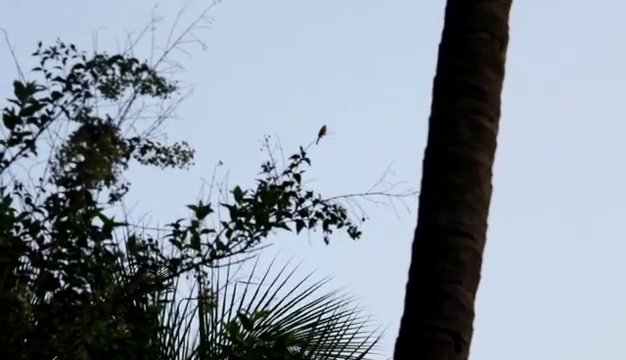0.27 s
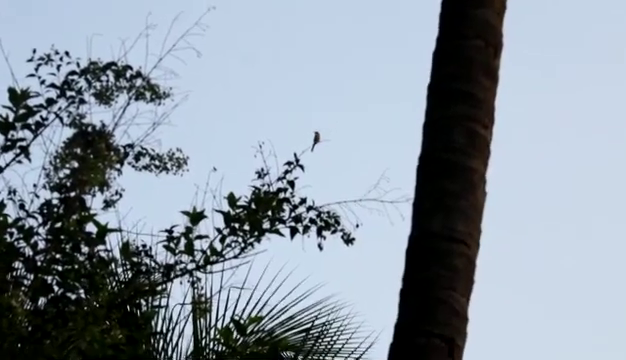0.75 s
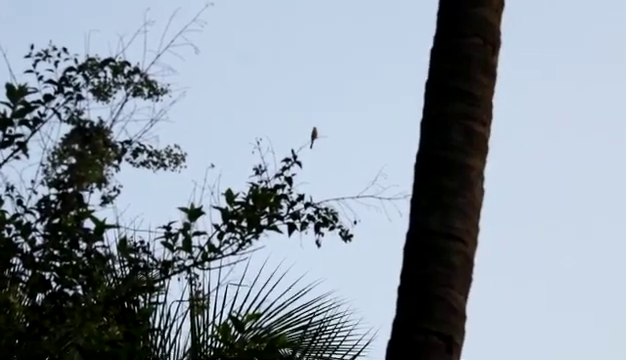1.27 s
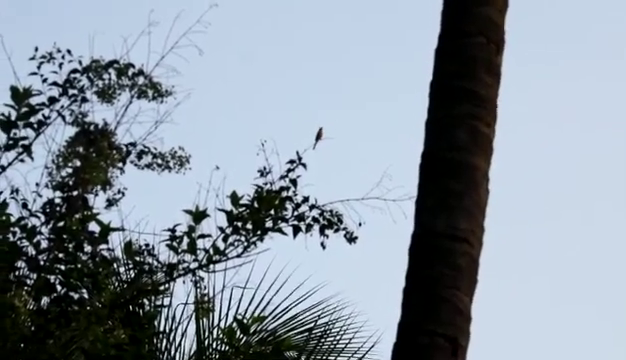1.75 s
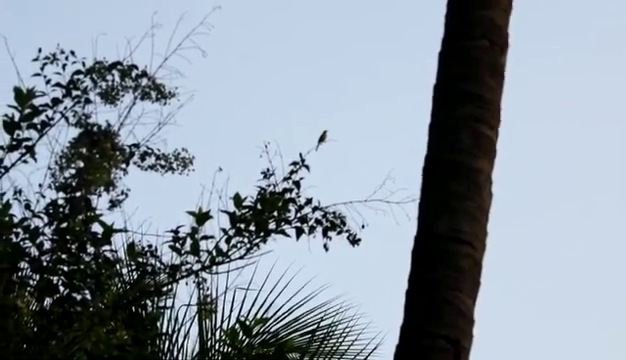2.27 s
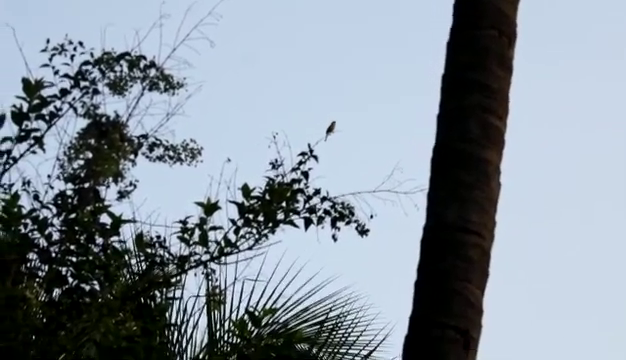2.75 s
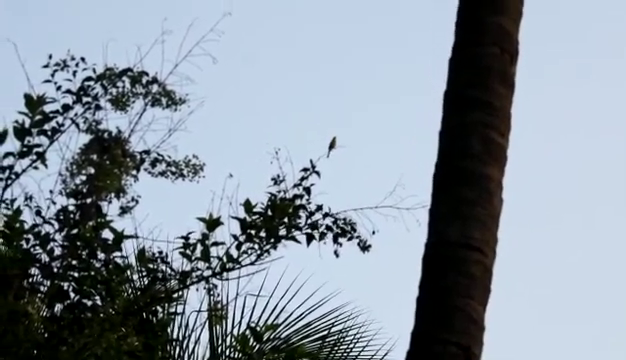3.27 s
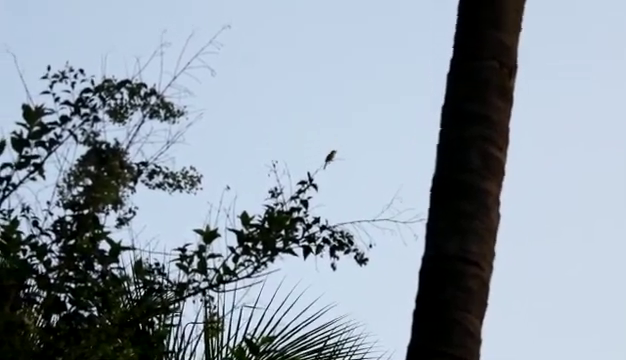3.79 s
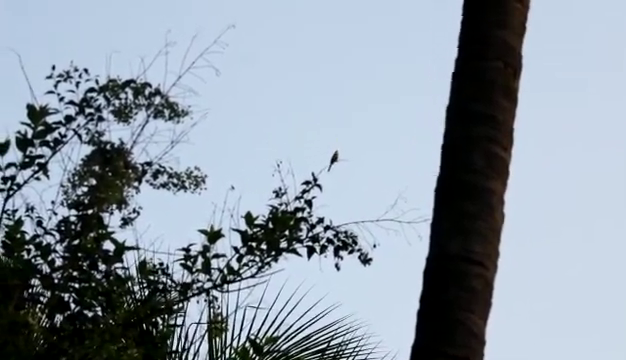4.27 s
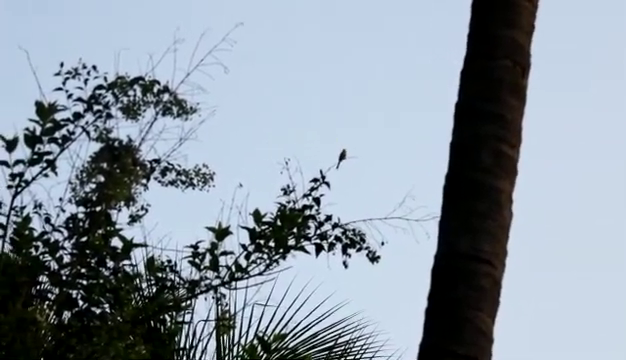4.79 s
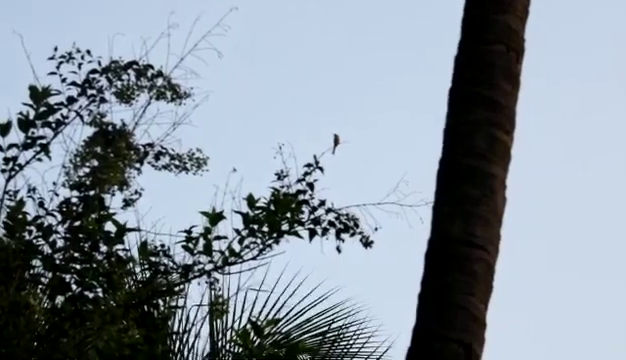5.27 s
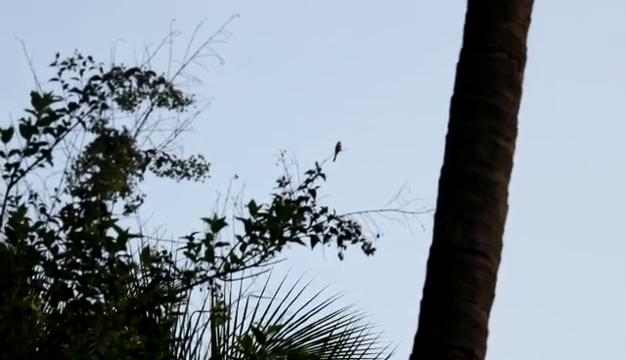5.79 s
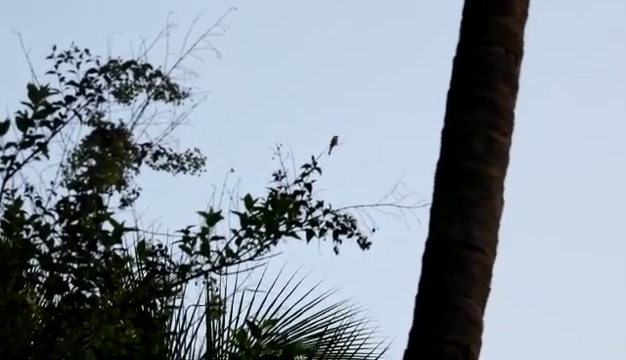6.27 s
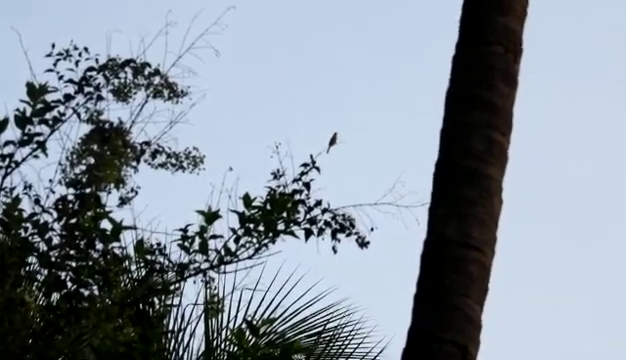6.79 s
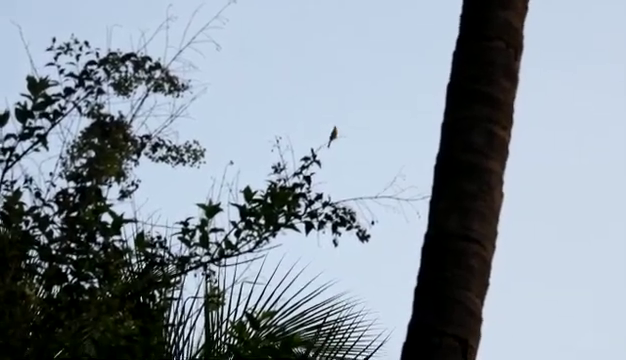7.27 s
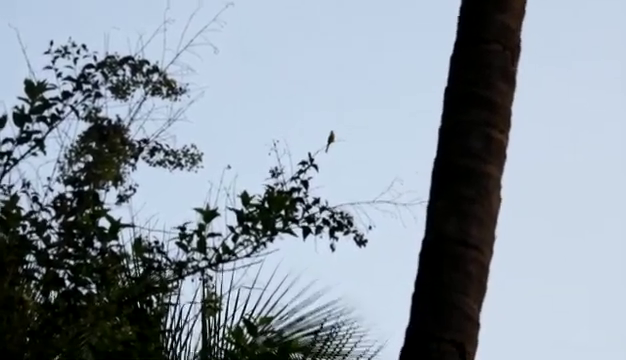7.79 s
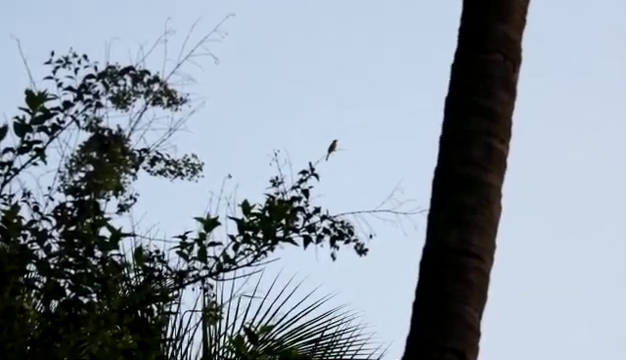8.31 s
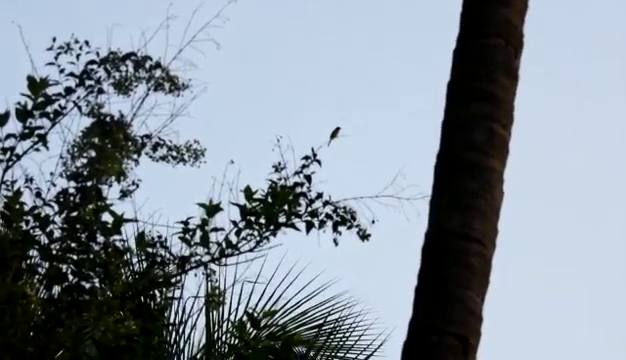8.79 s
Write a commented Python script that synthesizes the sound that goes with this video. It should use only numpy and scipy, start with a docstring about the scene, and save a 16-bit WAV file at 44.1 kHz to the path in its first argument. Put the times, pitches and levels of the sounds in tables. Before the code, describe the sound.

A small bird sings two bouts of rapid, evenly repeated clear high four-note phrases outdoors, over shimmering insect drone, faint distant whistles and dull knocks.

```python
"""A small bird on a twig sings two bouts of a four-note phrase at dawn, as near-sine notes that swell and
glide. A wall behind returns each note; other walls and leaves blur the reply. Other birds whistle far off, and
a village adds hollow tones, dull ticks and band-filtered rustles. Insects drone in two bands of pulsed,
resonant noise above a low murmur of shaped noise and a thin wide hiss."""
import sys
import numpy as np
from scipy import signal
from scipy.fft import rfft, irfft
from scipy.io import wavfile
from scipy.ndimage import uniform_filter1d

SR = 44100
rng = np.random.default_rng(int(sys.argv[2]) if len(sys.argv) > 2 else 0)


def unload_wav(signal):
    """Save mono or channel-first audio to the path in sys.argv[1] as 16-bit WAV at rate SR, clipped to [-1, 1]."""
    wavfile.write(
        sys.argv[1],
        SR,
        np.round(np.clip(np.atleast_2d(signal).T, -1, 1) * 32767).astype(np.int16),
    )


N = 398663

# The bird's notes
OVERTONE_DB = -52   # centre of the chance level of the octave
ATTACK_DB, RELEASE_DB, DROP_MS = 22, 39, 1.91
SWEEP_LEAD_MS, SWEEP_MS = 3.2, 7.3   # the upsweep is steepest this long before the loudest moment
NOTE_SPREAD_HZ, NOTE_SPREAD_DB = 8, 0.5   # chance from note to note
# The wall is too small to return the lower pitches fully
WALL_MS, WALL_BASS_HZ = 31.42, 4120
GARDEN_DB, GARDEN_T60_S, GARDEN_RISE_S = -5, 0.78, 0.0067

# Far whistles
WOBBLE_HZ, BUZZ_WOBBLE_HZ = 32, 60   # spread of the fast pitch wobble, wider in buzzy calls
BUZZ_HZ, WAVER_DB = 232.6, 1.5
FAR_WET_DB, FAR_T60_S, FAR_RISE_S = -1, 1.0, 0.025

# Village, insects and air
HUM_ROUGH, HUM_RISE_S = 0.4, 0.017   # share of noise in the low tones, and their rise
RUSTLE_HOLD_S, RUSTLE_FLICKER_DB = 0.04, 1.2
LOW_PULSE_HZ, HIGH_PULSE_HZ = 63.5, 120.3   # mean wing strokes a second
HISS_DB, HISS_FLICKER_DB = -66.5, 2.5
CUTOFF_HZ = 14250


def amp(db):
    """Decibels to a linear gain."""
    return 10 ** (np.asarray(db) / 20)


def rms_one(x):
    """Scale a sound to rms 1."""
    return x / np.sqrt(np.mean(x ** 2) + 1e-20)


def clock():
    """Time of every sample in seconds."""
    return np.arange(N) / SR


def drift(rate):
    """Slow chance of rms 1: noise knots smoothed by a one-pole low-pass, with its corner at rate [Hz]."""
    knots_hz = 40
    knots = rng.standard_normal(int(N / SR * knots_hz) + 2)
    smooth = signal.lfilter([1], [1, -np.exp(-2 * np.pi * rate / knots_hz)], knots)
    return np.interp(clock() * knots_hz, np.arange(len(knots)), rms_one(smooth))


def resonate(x, hz, width_hz):
    """Ring a sound through one two-pole resonance; a narrower width rings longer."""
    r = np.exp(-np.pi * width_hz / SR)
    feedforward = [(1 - r * r) / 2, 0, (r * r - 1) / 2]
    feedback = [1, -2 * r * np.cos(2 * np.pi * hz / SR), r * r]
    return signal.lfilter(feedforward, feedback, x)


def coloured(spectrum):
    """Noise of rms 1 whose spectrum runs straight between the given points on a log pitch scale."""
    hz, db = np.transpose(spectrum)
    grid = np.maximum(np.fft.rfftfreq(N, 1 / SR), 1)
    colour = amp(np.interp(np.log(grid), np.log(hz), db))
    return rms_one(irfft(rfft(rng.standard_normal(N)) * colour, N))


def add(track, s, sound):
    """Mix a sound into a track at s seconds, trimmed at the end."""
    at = round(s * SR)
    track[at:at + len(sound)] += sound[:max(N - at, 0)]


def scatter(x, t60, rise_s):
    """Leaves and walls all round: a dense noise tail of unit energy, decaying exponentially."""
    t = np.arange(SR) / SR
    tail = rng.standard_normal(SR) * amp(-60 * t / t60) * (1 - np.exp(-t / rise_s))
    return signal.fftconvolve(x, tail / np.sqrt(np.sum(tail ** 2)))[:N]


def swell(s, rise_s, hold_s, t60):
    """An envelope that rises in a straight line, holds and dies away exponentially."""
    t = clock() - s
    return np.clip(t / rise_s, 0, 1) * amp(-60 * np.maximum(t - rise_s - hold_s, 0) / t60)


def sung_note(shape, level_db, change_hz, chance):
    """A near-sine with a faint octave; it swells, glides and breaks off."""
    _, hz, _, _, swell_ms, swell_db, attack_ms, release_ms, drop_hz, glide, sweep_hz = shape
    t = np.arange(-swell_ms, release_ms, 1000 / SR)   # ms from the loudest moment
    age = t + swell_ms

    pitch = hz + change_hz + NOTE_SPREAD_HZ * chance[0] + glide * t
    pitch = pitch + drop_hz * np.exp(-age / DROP_MS)
    pitch = pitch + sweep_hz * np.tanh((t + SWEEP_LEAD_MS) / SWEEP_MS)
    phase = 2 * np.pi * (np.cumsum(pitch) / SR + rng.random())

    shape_db = np.where(t < 0, swell_db * t / swell_ms, -RELEASE_DB * (t / release_ms) ** 2)
    shape_db = shape_db - ATTACK_DB * np.exp(-(age / attack_ms) ** 2)
    size = amp(level_db + NOTE_SPREAD_DB * chance[1] + shape_db)
    size = uniform_filter1d(size, size=40) * signal.windows.tukey(len(t), 0.1)
    octave = amp(OVERTONE_DB + 3 * chance[2]) * np.sin(2 * phase)
    return size * (np.sin(phase) + octave)


def singer():
    """Sung phrases and their reflections; the wall hears the bird from another side, so echo levels differ."""
    # The four notes of a phrase, each timed at its loudest moment:
    # (place in the phrase [ms], base pitch [Hz], level [dB], echo change [dB], swell [ms], swell [dB],
    #  attack [ms], release [ms], onset drop [Hz], glide [Hz per ms], upsweep to either side [Hz])
    notes = [(-92, 4315, -9.5, 3, 16, 14, 2, 7.5, 149.5, -2.5, -0.5),
             (-64.5, 4700, -0.5, .8, 19, 15.5, 2.3, 7.7, 199.5, -5, -2),
             (-36, 5085, 4, -2, 26.3, 13.5, 5.1, 6.9, 1900.5, -15, 1),
             (3, 4562, 2, 1.5, 28.73, 4.5, 6.3, 16.3, -1, 18, 365)]
    # Phrases as sung: (time [s], level [dB], wall echo [dB], level change of notes one, two and three [dB each],
    #  pitch change of notes one and two [Hz each], their extra echo [dB], their shift [ms], shift of note three [ms])
    phrases = [(1.2816, -18, 0, -2, -5, 0, -20, 60, -1, .3, -1),
               (1.5655, -17, -0.5, 0, -0.5, 0, -60, -32, -2, 0, 1),
               (1.8245, -16.5, -1, 1.5, -3, 1, 56, 70, -1, 0, 1.3),
               (2.1157, -17.5, -1.5, 2.5, 0.5, 1, 30, -39.5, 2, -1.5, -2),
               (2.375, -17.5, -1, 1.5, .5, -1, -86, -60, 0.5, -1, .7),
               (2.6571, -17.5, -2, -.5, 1, 1, -30.5, 10, 1.5, -1, 1),
               (2.942, -16.5, -3, -2, 0.5, -.5, 10, -60, 0, -0.5, -0.2),
               (3.2267, -17, 0, 1, 2, -0.5, -60, -30, 0, -1.5, -0.2),
               (3.5558, -17.5, -1, 0.5, .5, 0, 10, -20, 2, -0.5, 0.2),
               (3.8421, -17.5, -1.5, 3.5, -1, .5, 70, -30, 3.5, -2.5, -0.9),
               (4.1206, -17.5, 0, -2, -1.5, -2, 10, -61, -1.5, -1.1, -0.5),
               (6.8911, -17, 1, 3, -1, -.5, 60, 1, -.5, 1.5, 1),
               (7.17, -17, -0.5, 0.5, -2, 1.5, -31, 10, 1, .7, 1.8),
               (7.4456, -15.5, 0.5, 1.5, -3, -.5, -35, 25, 1, .3, 0.5),
               (7.7163, -15.5, 0, 3, -2, -1.5, 30, 60, -1, 1.2, -1),
               (7.9841, -16, -1.5, 0, -0.5, -3, 10, -18, -1, 0, -2.7),
               (8.276, -17, 0, 2, -1.5, -0.5, -36, -50, -0.5, -.1, -1),
               (8.558, -17, 1.5, -0.5, -.5, -1.5, -34, -15, 1, -.2, 1),
               (8.8346, -17, 0.5, 0.5, -1, -0.5, 10, -15, -1, -0.3, 2),
               (9.1243, -16.5, -1.5, 0, -1, 0, 0, 0, 0, 0, 0)]
    # Ground and branches near the path: (delay [ms], signed gain [ratio])
    near = [(1.75, -0.082), (2.378, -0.024), (3.56, 0.048), (4.87, 0.11), (5.741, 0.15), (6.49, 0.17)]
    # Other walls, nearer and farther: (delay [ms], level [dB])
    late = [(62.6, -14), (17.06, -16.5), (45, -13), (77, -26), (95, -23.5)]

    direct, wall = np.zeros(N), np.zeros(N)
    for (s, phrase_db, wall_db, first_db, second_db, third_db,
         first_hz, second_hz, extra_db, opening_ms, third_ms) in phrases:
        changes = [(first_db, first_hz, extra_db, opening_ms),
                   (second_db, second_hz, extra_db, opening_ms),
                   (third_db, 0, 0, third_ms),
                   (0, 0, 0, 0)]
        for shape, (change_db, change_hz, more_echo_db, change_ms) in zip(notes, changes):
            place_ms, _, level_db, echo_db, swell_ms = shape[:5]
            chance = rng.standard_normal(4)
            note = sung_note(shape, phrase_db + level_db + change_db, change_hz, chance)
            start = s + (place_ms + change_ms - swell_ms) / 1000
            add(direct, start, note)
            reply_db = wall_db + echo_db + more_echo_db + NOTE_SPREAD_DB * chance[3]
            add(wall, start + WALL_MS / 1000, amp(reply_db) * note)

    bass_cut = signal.butter(4, WALL_BASS_HZ, "high", fs=SR, output="sos")
    wall = signal.sosfilt(bass_cut, wall + 1e-18)
    for ms, late_db in late:
        add(wall, ms / 1000, amp(late_db) * direct)

    # Short reflections comb the direct sound and the wall replies alike
    hz = np.fft.rfftfreq(N, 1 / SR)
    paths = 1 + sum(gain * np.exp(-2j * np.pi * hz * ms / 1000) for ms, gain in near)
    garden = amp(GARDEN_DB) * scatter(direct, GARDEN_T60_S, GARDEN_RISE_S)
    return irfft(rfft(direct + wall) * paths, N) + garden


def far_birds():
    """Gliding, wobbling whistles with buzz tones above; they waver in the air and echo."""
    # (time [s], length [s], first pitch [Hz], last pitch [Hz], level [dB], buzz against the whistle [dB])
    whistles = [(0.151, 0.37, 3380, 3980, -55, -30), (0.415, 0.055, 3960, 3960, -45, -32),
                (0.57, 0.23, 4240, 3900, -51.5, -30), (0.71, .25, 3260, 2860, -53.5, -20),
                (1.319, .055, 2380, 2420, -37, -7), (1.54, 0.028, 2610, 1706, -43, -4),
                (1.56, 0.057, 1640, 1995, -43.5, -4), (1.585, 0.18, 2180, 2187, -51.5, -20.5),
                (3.285, .08, 2300, 2475, -48, -4.5), (3.644, 0.034, 2060, 2030, -46.5, -26),
                (4.53, 0.31, 2785, 2775, -53, -28), (4.69, 0.12, 3750, 3840, -58, -30),
                (5.509, 0.057, 2380, 2307, -41, -9), (5.552, 0.14, 3960, 3970, -55, -30),
                (5.748, 0.028, 2290, 1710, -45, -2), (5.77, 0.033, 1720, 1900, -44, -4.5),
                (5.779, 0.13, 2090, 2140, -49, -22), (5.775, 0.25, 3970, 3950, -52, -32),
                (5.849, 0.17, 3790, 3680, -52, -32), (6.358, 0.16, 2050, 2160, -53.5, -33),
                (6.738, 0.054, 3520, 3200, -57, -37), (6.94, .18, 3380, 3650, -53.5, -33),
                (7.488, .07, 3700, 3170, -55, -31), (8.05, .08, 3620, 3200, -54, -30),
                (7.719, 0.16, 2165, 2014, -52.5, -30), (8.26, 0.19, 3380, 3700, -51, -32)]
    out = np.zeros(N)
    wobble = rms_one(uniform_filter1d(rng.standard_normal(N), size=400))
    for s, length, first_hz, last_hz, level_db, buzz_db in whistles:
        glide = np.linspace(first_hz, last_hz, round(length * SR))
        spread = WOBBLE_HZ + BUZZ_WOBBLE_HZ * min(amp(buzz_db), 1)
        pitch = glide + spread * wobble[round(s * SR):][:len(glide)]
        phase = 2 * np.pi * np.cumsum(pitch) / SR
        buzz = 2 * np.pi * BUZZ_HZ * np.arange(len(glide)) / SR
        tones_above = np.sin(phase + buzz) + 0.58 * np.sin(phase + 2 * buzz)
        tone = np.sin(phase) + amp(buzz_db) * tones_above
        add(out, s, amp(level_db) * signal.windows.tukey(len(glide), 0.6) * tone)
    out = out * amp(WAVER_DB * drift(22))
    return out + amp(FAR_WET_DB) * scatter(out, FAR_T60_S, FAR_RISE_S)


def hollow_tones():
    """Mostly low sines, roughened by noise ringing at the same pitch."""
    # (time [s], hold [s], pitch [Hz], width of each roughness resonance [Hz], level [dB], t60 [s])
    hums = [(1.99, .06, 314, 43, -48.5, .4), (4.179, 0.05, 301, 39, -45, 0.25),
            (4.322, 0.018, 295, 78, -40, 0.19), (4.384, 0.09, 282, 27, -44, .3),
            (4.6, 0.083, 280, 17, -53, 0.55), (4.79, 0.17, 75.1, 14, -43, 1.0),
            (4.728, .15, 697, 30, -54.5, .5), (6.03, 0.08, 211.6, 47, -54, 0.71),
            (8.906, .06, 352.4, 21, -44, .3), (8.91, 0.17, 581, 52, -43.5, .5)]
    white, out = rng.standard_normal(N), np.zeros(N)
    for s, hold_s, hz, width_hz, level_db, t60 in hums:
        rough = rms_one(resonate(resonate(white, hz, width_hz), hz, width_hz))
        tone = np.sin(2 * np.pi * hz * clock()) + HUM_ROUGH * rough
        out += amp(level_db) * tone * swell(s, HUM_RISE_S, hold_s, t60)
    return out


def dull_ticks():
    """Short knocks: sines that start at once and die exponentially."""
    # (time [s], pitch [Hz], starting level [dB], t60 [s])
    ticks = [(2.216, 520, -26.5, 0.031), (2.216, 336, -34, 0.035), (2.216, 800, -39, 0.018),
             (2.285, 790, -34, .03), (2.378, 1710, -33, .02), (2.56, 1750, -35, 0.024),
             (6.0, 1340, -34, 0.036)]
    out = np.zeros(N)
    t = np.arange(SR // 10) / SR
    for s, hz, peak_db, t60 in ticks:
        add(out, s, amp(peak_db - 60 * t / t60) * np.sin(2 * np.pi * hz * t))
    return out


def rustles():
    """Band-passed noise that flickers, swells and dies away."""
    # (time [s], rise [s], t60 [s], low edge [Hz], high edge [Hz], mean level [dB])
    rustle_bands = [(.35, 0.021, 1.0, 600, 2220, -47.5), (2.189, 0.016, 1.4, 302, 1390, -44.5),
                    (2.195, .02, 1.6, 1410, 2950, -46), (5.96, 0.046, 1.3, 200, 1720, -41.5),
                    (5.985, 0.01, 1.1, 1780, 3570, -42.5), (5.97, 0.058, 0.81, 3570, 8100, -44),
                    (8.88, 0.033, 1.0, 300, 1610, -46.5)]
    white, out = rng.standard_normal(N), np.zeros(N)
    for s, rise_s, t60, low_hz, high_hz, level_db in rustle_bands:
        band_pass = signal.butter(4, [low_hz, high_hz], "band", fs=SR, output="sos")
        band = rms_one(signal.sosfilt(band_pass, white))
        level = amp(level_db + RUSTLE_FLICKER_DB * drift(15))
        out += level * band * swell(s, rise_s, RUSTLE_HOLD_S, t60)
    return out


def village():
    """Hollow tones, ticks and rustles from the houses around."""
    return hollow_tones() + dull_ticks() + rustles()


def insects(wings, pulse_hz, depth, throb_db):
    """Wing strokes pulse a scraping noise that rings in the wing resonances, each throbbing by itself."""
    stroke = 2 * np.pi * np.cumsum(pulse_hz * (1 + 0.0088 * drift(1.5))) / SR
    scrape = rng.standard_normal(N) * (1 + np.clip(depth, 0, 1) * np.cos(stroke))
    rung = np.zeros(N)
    for hz, width_hz, db in wings:
        ringing = resonate(resonate(scrape, hz, width_hz), hz, width_hz)
        rung += amp(db + throb_db * drift(6)) * ringing
    return rms_one(rung)


def insect_drone():
    """A low and a high chorus, each following its own level line."""
    # (time [s], low chorus level [dB], high chorus level [dB])
    chorus = [(0.0, -47, -59), (0.48, -46, -60.5), (0.73, -47, -65), (1.41, -45, -61.5), (3.0, -47, -61),
              (3.27, -45, -63.5), (3.62, -47, -60.5), (4.33, -46, -61.5), (6.09, -46.5, -61.5),
              (6.8, -47.5, -61.5), (8.31, -45.5, -60.5), (9.04, -47.5, -63)]
    # Wing resonances: (pitch [Hz], width of each of two passes [Hz], relative level [dB])
    low_wings = [(4966, 640, -7.5), (5270, 450, 2), (5455, 200, 0), (5646, 246, -0.5), (6310, 220, -11.5)]
    high_wings = [(8400, 820, 0)]
    s, low_db, high_db = np.transpose(chorus)
    low = insects(low_wings, LOW_PULSE_HZ, depth=0.18, throb_db=1.5)
    high = insects(high_wings, HIGH_PULSE_HZ, depth=0.31, throb_db=2.5)
    return amp(np.interp(clock(), s, low_db)) * low + amp(np.interp(clock(), s, high_db)) * high


def murmur():
    """Far traffic, leaves and air: shaped noise at a gently moving level."""
    # Spectrum: (frequency [Hz], relative density [dB per Hz])
    murmur_spectrum = [(15, -38), (25, -10.5), (64, -2), (128, -3), (245, -1), (467, -5), (890, -7),
                       (1740, -10.5), (3550, -15.5), (5000, -20), (7000, -21), (9000, -26.5), (10300, -38),
                       (14000, -42.5)]
    # (time [s], level [dB])
    murmur_level = [(0.0, -45), (2.2, -45), (3.8, -46), (4.7, -44.5), (5.64, -45.5), (6.17, -43.5),
                    (6.5, -45.5), (9.04, -45)]
    return amp(np.interp(clock(), *np.transpose(murmur_level))) * coloured(murmur_spectrum)


def wide_hiss():
    """A flickering treble hiss, opposite in sign between the two channels."""
    # Spectrum: (frequency [Hz], relative density [dB per Hz])
    hiss_spectrum = [(5000, -69), (6000, -8.5), (6900, -2), (8900, -3), (9700, -14), (14000, -21)]
    return amp(HISS_DB + HISS_FLICKER_DB * drift(10)) * coloured(hiss_spectrum) * [[1], [-1]]


def scene():
    """Everything arrives in the middle; only a thin treble hiss is wide."""
    middle = singer() + far_birds() + village() + insect_drone() + murmur()
    return middle + wide_hiss()


def record(dry):
    """A steep low-pass cuts the top."""
    top_cut = signal.cheby2(16, 70, CUTOFF_HZ, fs=SR, output="sos")
    return signal.sosfilt(top_cut, dry)


dry = scene()
out = record(dry)
unload_wav(out)
```